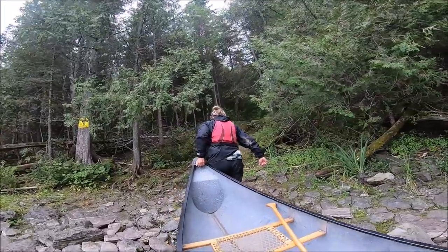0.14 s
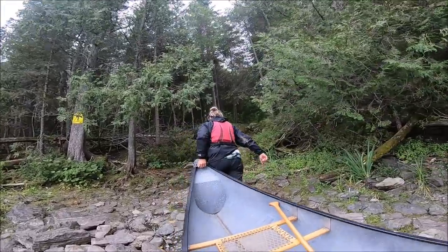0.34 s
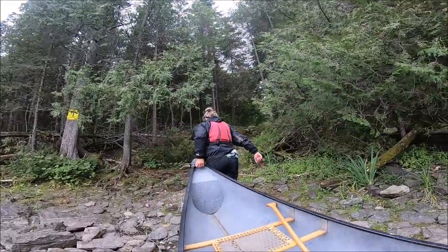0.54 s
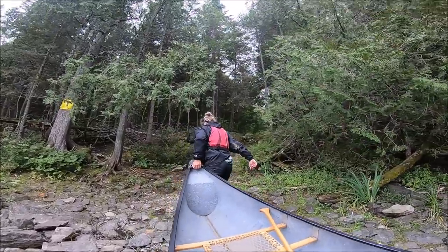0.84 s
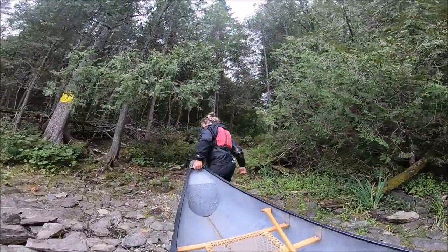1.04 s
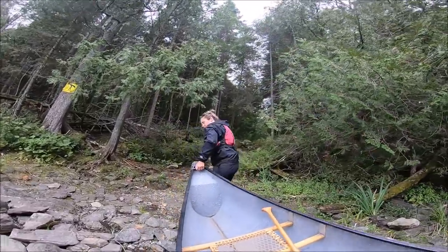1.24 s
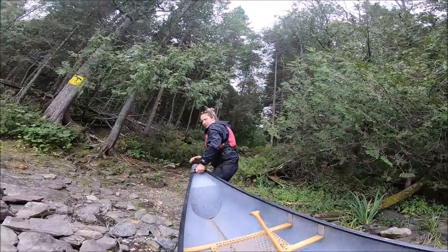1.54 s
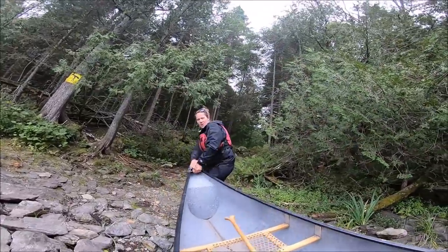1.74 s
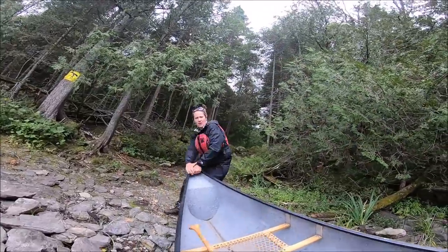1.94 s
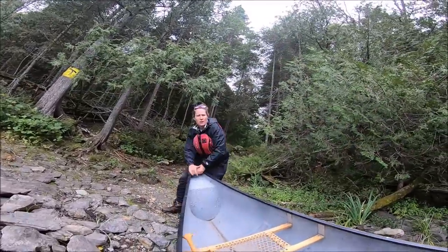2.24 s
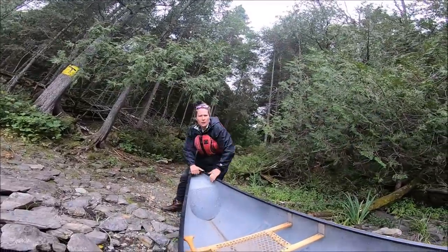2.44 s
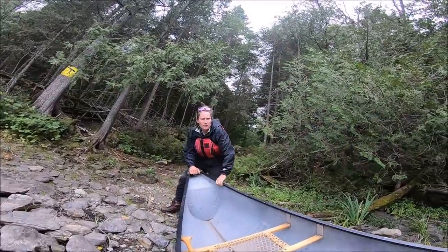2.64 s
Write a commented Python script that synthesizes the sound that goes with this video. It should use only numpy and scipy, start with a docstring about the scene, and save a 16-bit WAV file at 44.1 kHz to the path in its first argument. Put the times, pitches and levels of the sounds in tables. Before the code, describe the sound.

A plastic canoe hull grinds over loose rocks in one strong scrape, then weaker drags with hollow bumps, groans and grit cracks, before fading; heard close from inside the boat, outdoors on a quiet shore.

```python
"""A plastic canoe is hauled up a shore of loose rocks, heard from on board.
Dense random slips, filtered through short rings, make the grinding, the rasp and the fine grit.
Resonant hull modes drum under the sliding and boom at each bump; gliding tones squeak and groan.
Grit cracks and gravel ticks under the keel, with a faint scatter from the shore and quiet open air."""
import sys
import numpy as np
from scipy import signal
from scipy.fft import rfft, irfft
from scipy.io import wavfile
from scipy.ndimage import uniform_filter1d

SR = 44100
rng = np.random.default_rng(int(sys.argv[2]) if len(sys.argv) > 2 else 0)


def persist_wave(psi):
    """Save psi, clipped to +-1, as 16-bit WAV."""
    counts = np.round(np.clip(psi, -1, 1) * 32767).astype(np.int16)
    wavfile.write(sys.argv[1], SR, np.atleast_2d(counts).T)


N = 123479
T = np.arange(N) / SR

# Sliding contact: time_s, grinding_level_db, fine_grit_level_db
SLIDING_LEVELS = [(0.10, -62, -74.5), (0.236, -49.5, -70), (0.252, -27.5, -54.5), (0.32, -29.5, -59),
                  (0.39, -24.5, -52), (0.49, -28, -60), (0.56, -21.5, -60.5), (0.635, -34.5, -64),
                  (0.77, -33.5, -61.5), (0.92, -36.5, -64.5), (1.015, -44.5, -67), (1.10, -28.5, -62),
                  (1.21, -32, -62.5), (1.345, -41, -62.5), (1.43, -36, -63), (1.62, -43.5, -62.5),
                  (1.80, -38.5, -66.5), (2.02, -44, -63.5), (2.14, -40.5, -55.5), (2.315, -44, -64),
                  (2.33, -39, -56.5), (2.375, -41.5, -53.5), (2.425, -57, -65.5), (2.51, -48, -72),
                  (2.56, -65.5, -74), (2.68, -61.5, -67.5), (2.74, -77, -88)]
# Drumming of the hull as it slides: time_s, deep_modes_level_db, upper_modes_level_db
DRUMMING_LEVELS = [(0.12, -43, -49), (0.24, -39, -34), (0.42, -29, -23.5), (0.57, -27, -30.5),
                   (0.70, -31, -33.5), (0.85, -34, -30.5), (0.99, -40, -27), (1.20, -36, -38.5),
                   (1.27, -29.5, -25), (1.47, -27, -29.5), (1.63, -42, -37), (1.80, -33.5, -32),
                   (2.04, -26.5, -40), (2.27, -32.5, -40.5), (2.40, -26, -41), (2.62, -33.5, -58.5),
                   (2.78, -55.5, -83)]
# Resonant modes of the hull: pitch_hz, level_db, t60_s
HULL_MODES = [(50.5, -8.5, .4), (74.2, -9.5, 0.34), (94.9, -1, 0.35), (121.4, 0.5, 0.29), (143.2, 3, 0.23),
              (169.1, 0.5, 0.36), (200.6, -2, 0.13), (227.6, 0, 0.18), (254.36, -0.5, 0.33),
              (294, -4.5, 0.16), (346, -7, 0.09), (382.5, -7, 0.14), (553.5, -11, 0.04),
              (690, -13.5, 0.086)]
# Bumps over rocks: start_s, crunch_level_db, crunch_length_s, boom_level_db,
# centre_hz of the modes it wakes, spread_octaves
ROCK_BUMPS = [(0.132, -31, 0.007, -20, 221, 0.76), (0.789, -26, 0.015, -21.5, 166, 0.3),
              (0.953, -28, 0.019, -22, 295, 0.56), (1.278, -26.5, 0.0079, -22.5, 690, 0.2),
              (1.366, -21.5, 0.0066, -10.5, 261, 0.23), (1.371, -39, 0.035, -13.5, 125, 0.33),
              (1.435, -41, .01, -14, 103, 0.42), (1.785, -35, 0.013, -27, 256, 0.071),
              (1.943, -35.5, 0.0024, -21.5, 120, 0.45), (2.085, -16.5, 0.0056, -14, 427, 0.89),
              (2.096, -30.5, 0.03, -11, 97.4, 0.31), (2.450, -31.5, 0.0047, -33, 202, 0.34),
              (2.459, -34, 0.0019, -16.5, 83.2, 0.23)]
# Grains of grit that crack: time_s, level_db
GRIT_CRACKS = [(0.798, -47), (0.951, -43), (1.358, -40.5), (1.371, -43), (2.088, -42), (2.102, -37.5)]
# Squeaks of the hull on wet stone: start_s, length_s, start_hz, end_hz, level_db
HULL_SQUEAKS = [(0.082, 0.051, 426, 387, -39), (1.244, 0.0097, 1050, 910, -18),
                (2.069, 0.036, 2890, 2783, -31.5), (2.592, 0.0235, 1050, 1590, -51.5),
                (2.599, 0.014, 2110, 2470, -47.5), (2.635, 0.053, 826, 2300, -44.5)]
# Groans of the hull as it rides off a rock: start_s, length_s, start_hz, end_hz, level_db
HULL_GROANS = [(0.139, 0.076, 239.6, 166, -24), (0.402, 0.068, 205, 150, -17.5),
               (0.588, 0.062, 145.6, 88, -15.5), (0.634, 0.04, 141.2, 94, -18.5),
               (1.273, 0.081, 165.2, 126, -16), (2.167, 0.065, 97.1, 89.7, -15.5)]
# Spectra of the layers, each: frequency_hz, level_db (per Hz, relative)
GRIND_COLOUR = [(200, -12), (400, -13), (650, -6), (1000, -5.5), (1300, -14.5), (1750, -14.5), (3000, -37)]
RASP_COLOUR = [(700, -27.5), (1500, -4), (2700, 0), (4000, -15), (6000, -49.5)]
GRIT_COLOUR = [(2000, -11.5), (4200, 8), (8500, -2), (14500, -26)]
CRUNCH_COLOUR = [(200, 4.5), (400, -1), (750, 8), (1150, -2), (2000, -2), (3000, -11), (4000, -19),
                 (7000, -34.5)]
AIR_COLOUR = [(45, 25), (300, -29), (2800, -17), (4500, -28.5)]
# Slow rocking of the boat: frequency_hz, level_db (per Hz, relative)
SWAY_COLOUR = [(15, 9.5), (45, 5.5), (200, -39.5)]
# Flexing of the panel that is hit: frequency_hz, level_db (per Hz, relative)
THUD_COLOUR = [(120, -13), (280, 1), (450, -10.5), (750, -7.5)]
# Fine gravel under the keel: frequency_hz, level_db (per Hz, relative)
GRAVEL_COLOUR = [(3000, -29), (6500, -2), (9000, -2), (11500, -24.5)]

SHELL_T60_S, STONE_T60_S = 0.023, 0.028  # ring of the hull's skin and of the stones
JUDDER_DB = 1.3  # unevenness of the sliding
RASP_SHARE, RASP_DB = 0.48, 2.5  # the rasp follows the grinding by this share, the grit by the rest
DEEP_COUNT = 4  # the first rows of HULL_MODES are the deep ones
DRIFT_S = 0.003  # rms time shift: the modes glide as the load shifts along the hull
SWAY_DB = -20.5  # relative to the deep modes
WAVER = 0.032  # rms pitch waver of squeaks and groans, as a share of pitch
DENT_BEND = 1.08  # share by which a full-scale blow raises the upper modes
DENT_RELAX_S = 0.015  # time constant of their fall back
CRUNCH_RISE_S, BOOM_RISE_S = 0.01, 0.0041
THUD_DB, THUD_T60_S = -1.5, 0.34
CRACK_S = 0.004
GRAVEL_FROM_S, GRAVEL_TO_S, GRAVEL_DB = 1.24, 1.93, -65.5
AIR_DB = -44
SHORE_DB, SHORE_T60_S = -13.5, 0.13  # scatter from the rocks around
ROLL_OFF_DB_PER_OCTAVE = 22
EDGE_HZ = 15500


def amp(db):
    """Decibels to gain."""
    return 10 ** (np.asarray(db) / 20)


def unit(x):
    """Scales to rms 1."""
    return x / np.sqrt(np.mean(x ** 2) + 1e-20)


def level(table, column):
    """One dB column of a curve, as a gain at every sample."""
    rows = np.array(table)
    return amp(np.interp(T, rows[:, 0], rows[:, column]))


def add(mix, start_s, sound):
    """Adds a sound to the mix at a time."""
    part = mix[max(round(start_s * SR), 0):][:len(sound)]
    part += sound[:len(part)]


def wander(hz):
    """Slow random drift of rms 1, up to about the given rate."""
    f = np.fft.rfftfreq(N, 1 / SR)
    spectrum = rfft(rng.standard_normal(N)) / (1 + (f / hz) ** 4)
    return unit(irfft(spectrum, N))


def colour(x, points, size=8192):
    """Causal minimum-phase filter with the given spectrum, falling above its last point; power gain 1."""
    f, db = np.transpose(points)
    octave = np.log2(abs(np.fft.fftfreq(size, 1 / SR)) + 1)
    octaves_above = np.clip(octave - np.log2(f[-1]), 0, 3.5)
    curve_db = np.interp(octave, np.log2(f), db) - ROLL_OFF_DB_PER_OCTAVE * octaves_above
    # The Hilbert transform of the log spectrum gives the minimum phase
    response = np.exp(np.conj(signal.hilbert(np.log(amp(curve_db)))))
    taps = np.fft.ifft(response).real[:size // 2]
    return signal.fftconvolve(x, taps / np.linalg.norm(taps))[:len(x)]


def tail(t60):
    """Decaying noise, standing for a dense cluster of dying modes; energy 1."""
    t = T[:SR // 3]
    wave = rng.standard_normal(len(t)) * amp(-60 * t / t60)
    return wave / np.linalg.norm(wave)


def ring(x, t60, direct=0.53, count=10):
    """Each click is followed by the ring of the spot it strikes; the spot keeps shifting."""
    spot = np.floor(3 * wander(hz=9) + 0.5 * rng.standard_normal(N)) % count
    rung = np.zeros(N)
    for k in range(count):
        rung += signal.fftconvolve(x * (spot == k), tail(t60))[:N]
    return (direct * x + rung) / np.hypot(direct, 1)


def slips(per_s, spread_db):
    """Random tiny slips of uneven size and either sign, rms 1."""
    size = amp(spread_db * np.minimum(rng.exponential(1, N), 4))
    sign = rng.choice([-1., 1.], N)
    return unit(size * sign * (rng.random(N) < per_s / SR))


def burst(t, rise, fall):
    """Quick linear rise, exponential fall."""
    return np.clip(t / rise, 0, 1) * np.exp(-np.maximum(t - rise, 0) / fall)


def scrape():
    """The hull catches and slips on the stone; the dense slips ring its shell and crush grit."""
    judder = unit(amp(JUDDER_DB * wander(hz=110)))
    hard, sandy = level(SLIDING_LEVELS, 1), level(SLIDING_LEVELS, 2)
    grind = colour(ring(slips(per_s=9000, spread_db=2.2), SHELL_T60_S), GRIND_COLOUR)
    rasp = colour(ring(slips(per_s=4500, spread_db=3.2), SHELL_T60_S), RASP_COLOUR)
    grit = colour(ring(slips(per_s=3000, spread_db=3.8), STONE_T60_S), GRIT_COLOUR)
    rasp_level = amp(RASP_DB) * hard ** RASP_SHARE * sandy ** (1 - RASP_SHARE)
    return judder * (grind * hard + rasp * rasp_level + grit * sandy)


def steady(x):
    """Evens out the loudness with a running rms, so that the level curve sets it."""
    return x / np.sqrt(uniform_filter1d(x ** 2, size=1500) + 1e-12)


def drumming():
    """Sparse slips keep the hull's gliding modes sounding, over the slow rocking of the boat."""
    t, drive = T[:SR // 2], slips(per_s=500, spread_db=4.0)
    modes = []
    for hz, db, t60 in HULL_MODES:
        decay = amp(-60 * t / t60) * np.sin(2 * np.pi * hz * t)
        shifted_drive = np.roll(drive, rng.integers(N))  # keeps the modes out of step
        mode = amp(db) * unit(signal.fftconvolve(shifted_drive, decay)[:N])
        modes.append(np.interp(T + DRIFT_S * wander(hz=6), T, mode, period=N / SR))
    sway = amp(SWAY_DB) * colour(rng.standard_normal(N), SWAY_COLOUR)
    deep = steady(sum(modes[:DEEP_COUNT])) + sway
    upper = steady(sum(modes[DEEP_COUNT:]))
    return deep * level(DRUMMING_LEVELS, 1) + upper * level(DRUMMING_LEVELS, 2)


def open_air():
    """Quiet open air: steady filtered noise."""
    return amp(AIR_DB) * colour(rng.standard_normal(N), AIR_COLOUR)


def gliding_tones(table):
    """Wavering sine tones that glide in pitch, each swelling and fading once."""
    out, waver = np.zeros(N), wander(hz=292)
    for start_s, length_s, start_hz, end_hz, db in table:
        progress = np.clip((T - start_s) / length_s, 0, 1)
        hz = (start_hz + (end_hz - start_hz) * progress) * (1 + WAVER * waver)
        tone = np.sin(2 * np.pi * np.cumsum(hz) / SR)
        out += amp(db) * np.sin(np.pi * progress) ** 2 * tone
    return out


def squeaks():
    """Brief regular stick-slip of the hull on wet stone, as gliding tones."""
    return gliding_tones(HULL_SQUEAKS)


def bumps():
    """Each rock crunches and booms; its modes depend on the spot, and the upper ones sag as the dent relaxes."""
    booms, force, t = np.zeros(N), np.zeros(N), T[:SR // 2]
    hz, db, t60 = np.transpose(HULL_MODES)
    index = np.arange(len(hz))
    is_upper = (index >= DEEP_COUNT)[:, None]
    # Phase lead, in seconds, of a pitch that starts raised and falls back
    lead = is_upper * DENT_BEND * DENT_RELAX_S * (1 - np.exp(-t / DENT_RELAX_S))
    for start_s, crunch_db, crunch_s, boom_db, centre_hz, octaves in ROCK_BUMPS:
        force += amp(crunch_db) * burst(T - start_s + CRUNCH_RISE_S / 2, CRUNCH_RISE_S, crunch_s)
        phase = 2 * np.pi * hz[:, None] * (t + amp(boom_db) * lead)
        modes = amp(-60 * t / t60[:, None]) * np.sin(phase)
        weight = amp(db) / (1 + (np.log2(hz / centre_hz) / octaves) ** 4)
        polarity = (-1) ** (index // 2)
        boom = (weight / np.linalg.norm(weight) * polarity) @ modes
        add(booms, start_s, amp(boom_db) * boom * np.minimum(t / BOOM_RISE_S, 1))
    blows = force * slips(per_s=5000, spread_db=2)
    crunch = colour(ring(blows, t60=0.035, direct=1.2), CRUNCH_COLOUR)
    thud = amp(THUD_DB) * colour(ring(blows, THUD_T60_S, direct=0), THUD_COLOUR)
    return booms + crunch + thud


def groans():
    """Low stick-slip of a whole panel as the hull rides off a rock, as falling tones."""
    return gliding_tones(HULL_GROANS)


def cracks():
    """Grains of grit burst under the keel, as short clusters of dense slips."""
    force = np.zeros(N)
    for time_s, db in GRIT_CRACKS:
        force += amp(db) * burst(T - time_s + CRACK_S / 2, CRACK_S / 2, CRACK_S)
    return colour(force * slips(per_s=12000, spread_db=2), GRIT_COLOUR)


def gravel():
    """Small stones tick in clusters against each other as the keel pushes through a patch of fine gravel."""
    progress = np.clip((T - GRAVEL_FROM_S) / (GRAVEL_TO_S - GRAVEL_FROM_S), 0, 1)
    swell = np.sqrt(abs(np.sin(np.pi * progress)))
    clusters = unit(amp(5 * wander(hz=35)))
    ticks = slips(per_s=400, spread_db=3) * clusters
    return amp(GRAVEL_DB) * swell * colour(ring(ticks, STONE_T60_S), GRAVEL_COLOUR)


def shore_scatter(canoe):
    """Rocks around scatter the canoe's sound back as a short diffuse tail."""
    return amp(SHORE_DB) * signal.fftconvolve(canoe, tail(SHORE_T60_S))[:N]


def scene():
    """The canoe, its faint scatter from the shore, and the open air, in one channel."""
    canoe = scrape() + drumming() + squeaks() + bumps() + groans() + cracks() + gravel()
    return (canoe + shore_scatter(canoe) + open_air())[None]


def record(dry):
    """Limits the band with a steep linear-phase low-pass."""
    low_pass = signal.firwin(511, EDGE_HZ, window=("kaiser", 9), fs=SR)
    return signal.oaconvolve(dry, low_pass[None], "same")


dry = scene()
out = record(dry)
persist_wave(out)
```